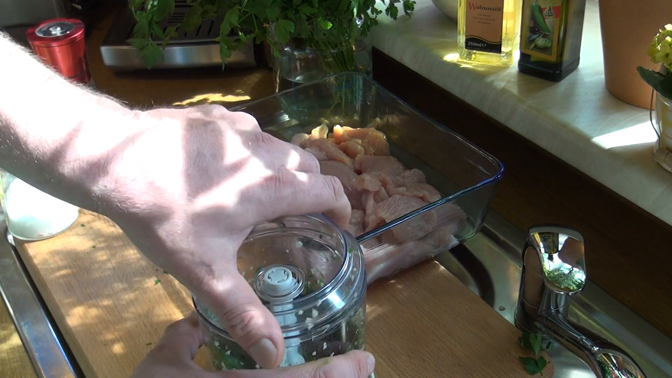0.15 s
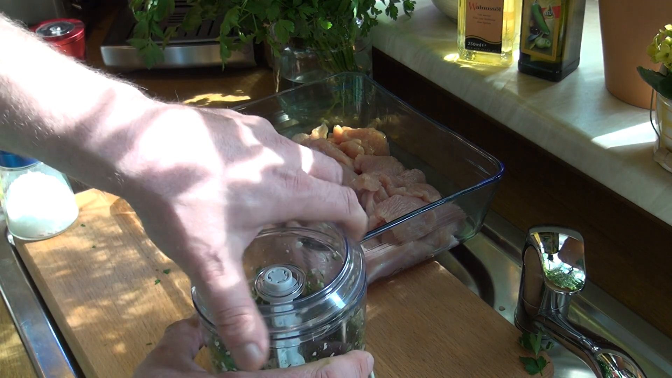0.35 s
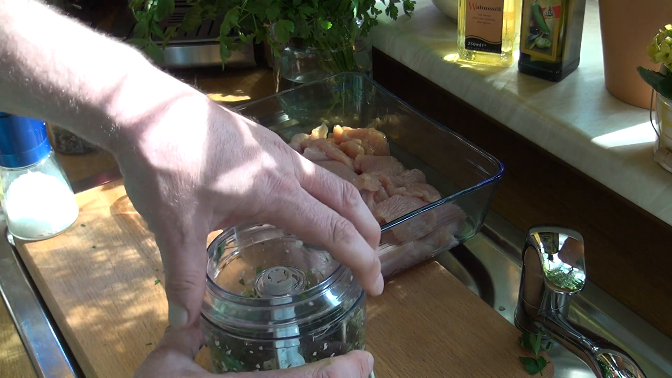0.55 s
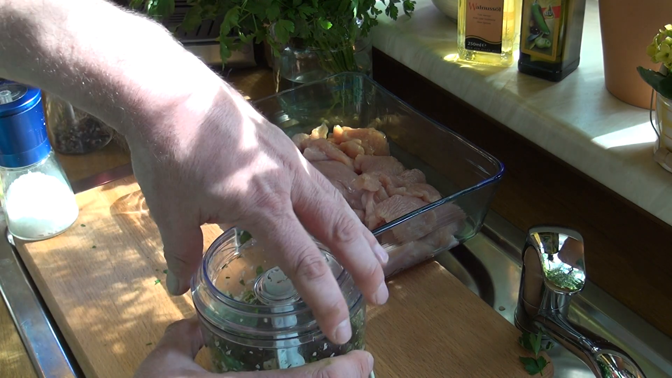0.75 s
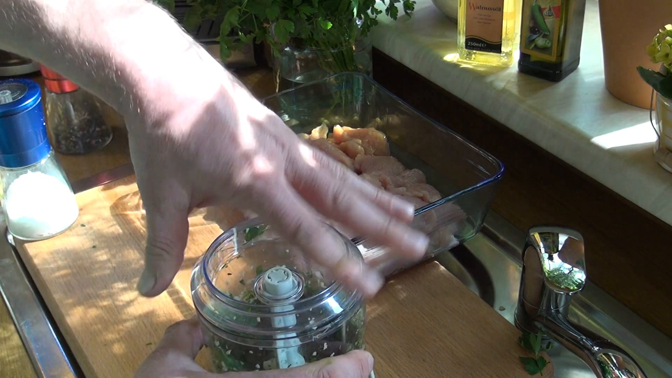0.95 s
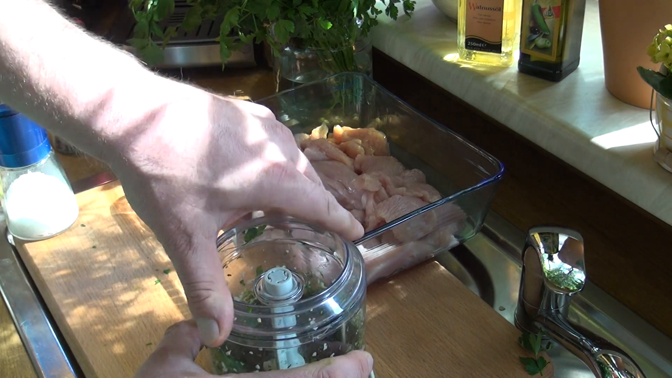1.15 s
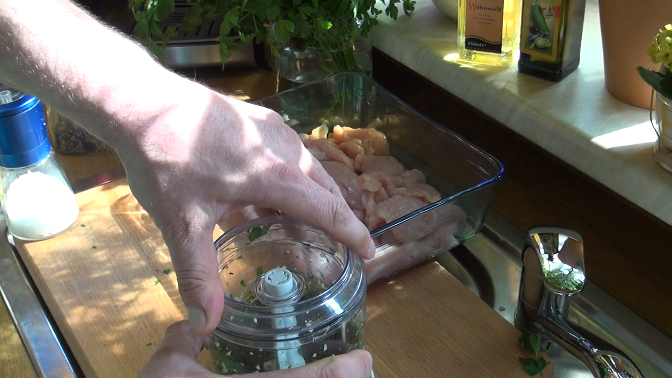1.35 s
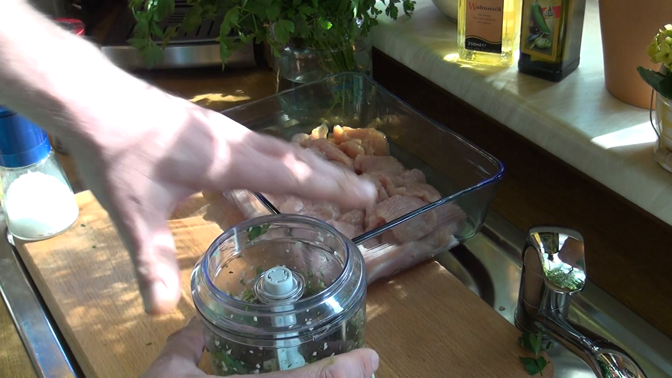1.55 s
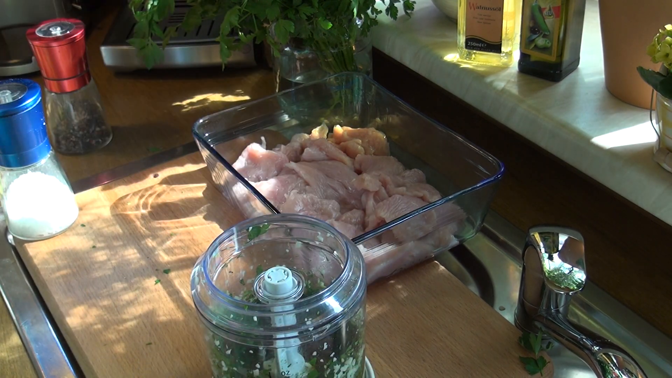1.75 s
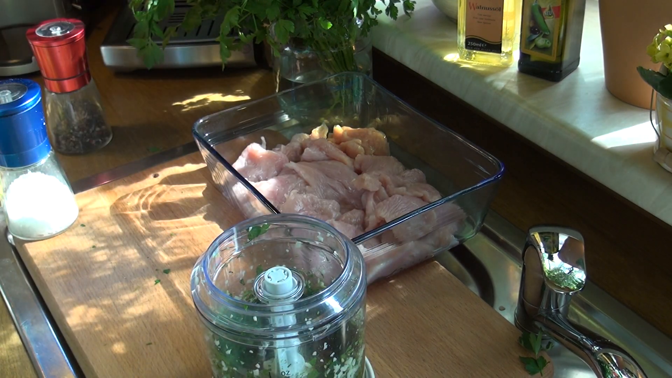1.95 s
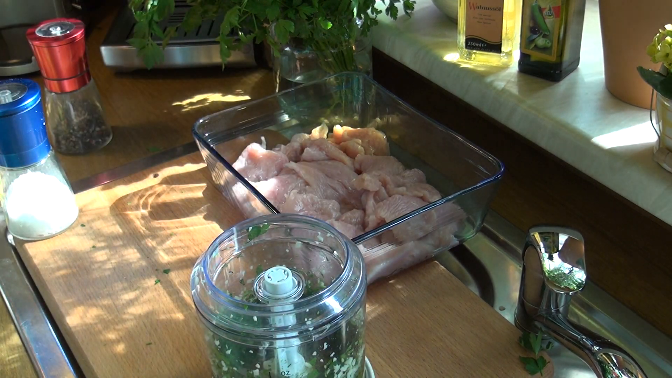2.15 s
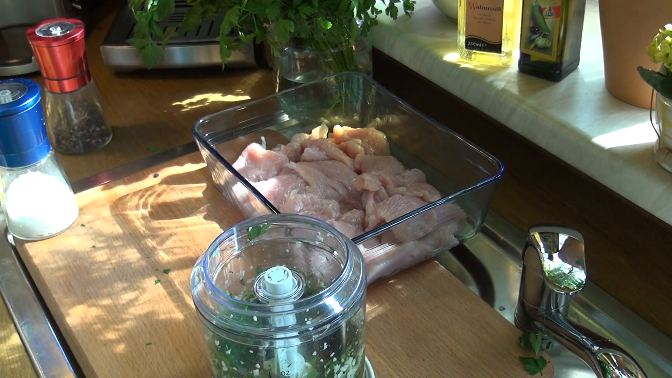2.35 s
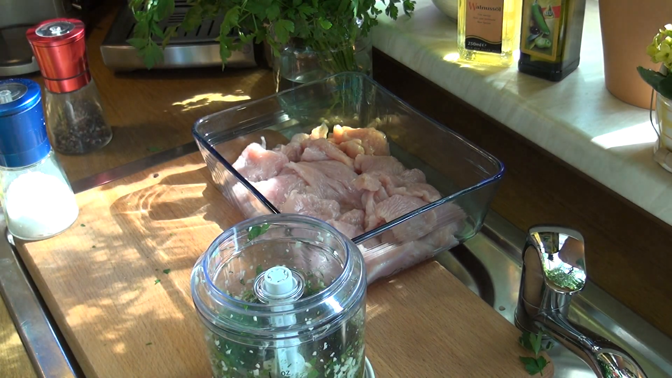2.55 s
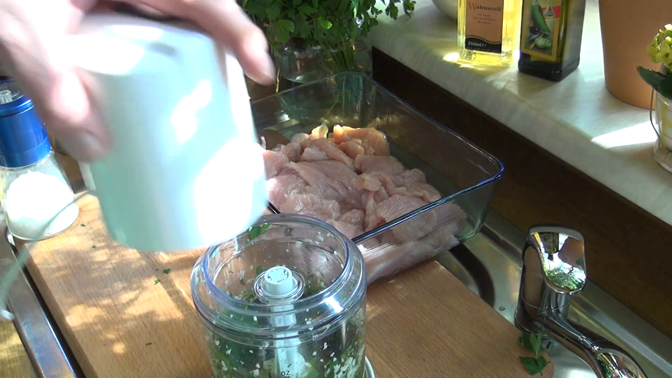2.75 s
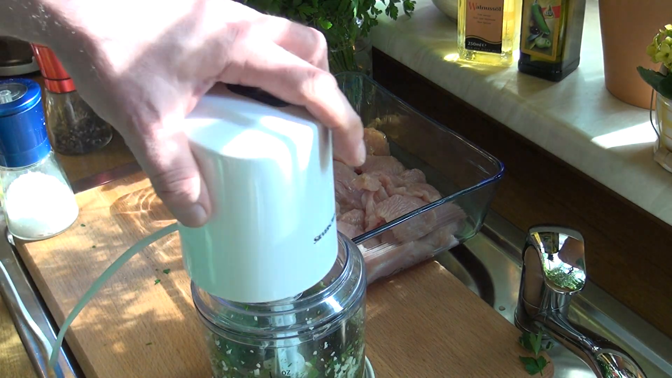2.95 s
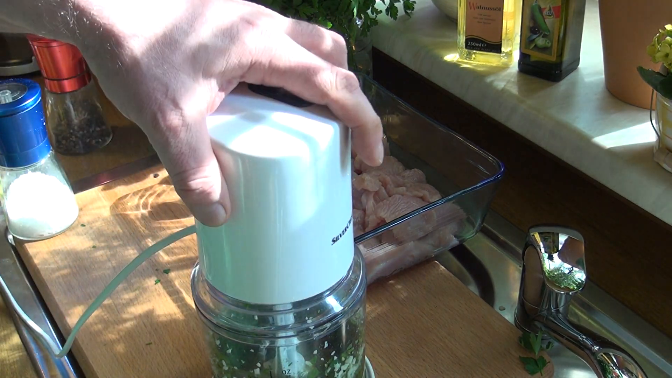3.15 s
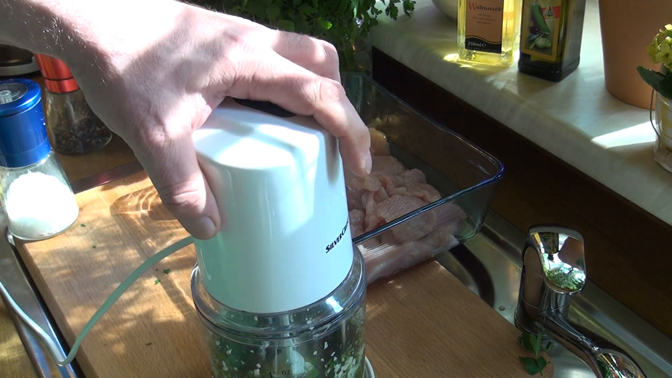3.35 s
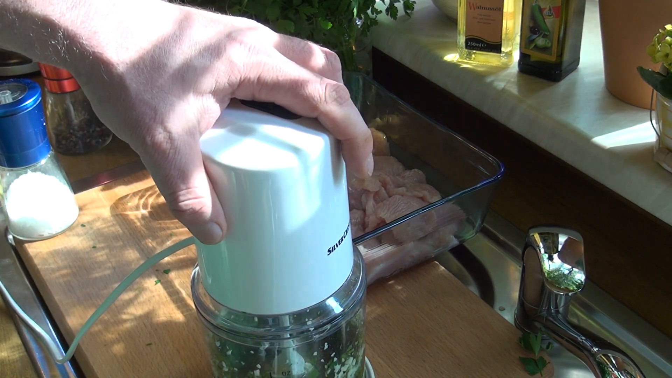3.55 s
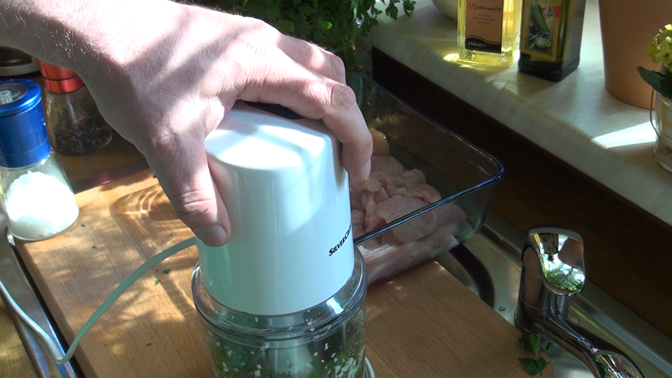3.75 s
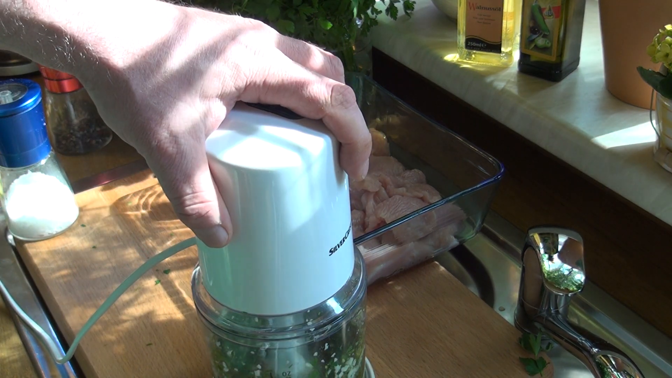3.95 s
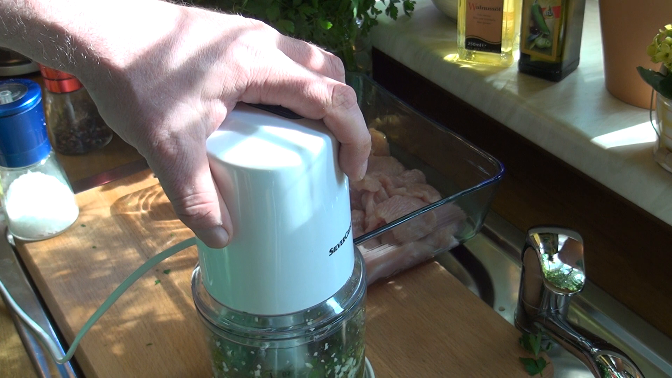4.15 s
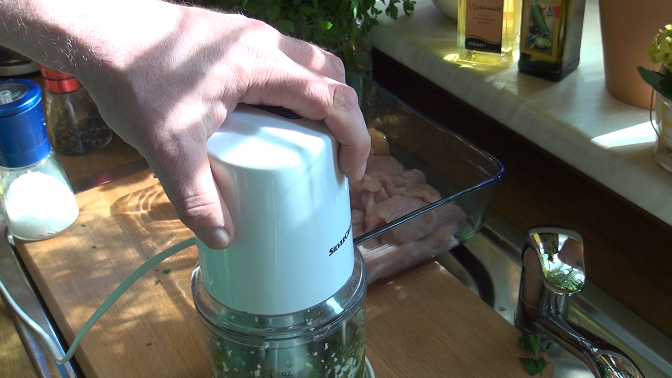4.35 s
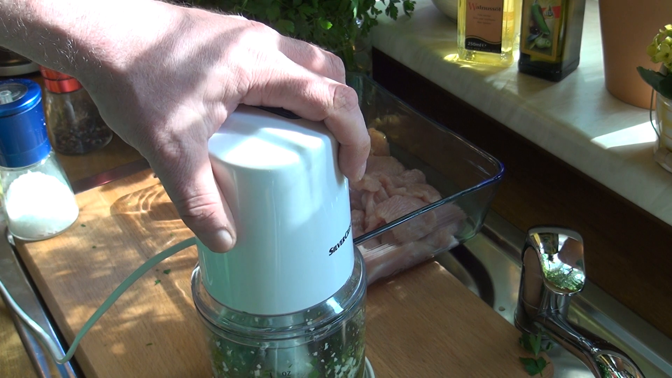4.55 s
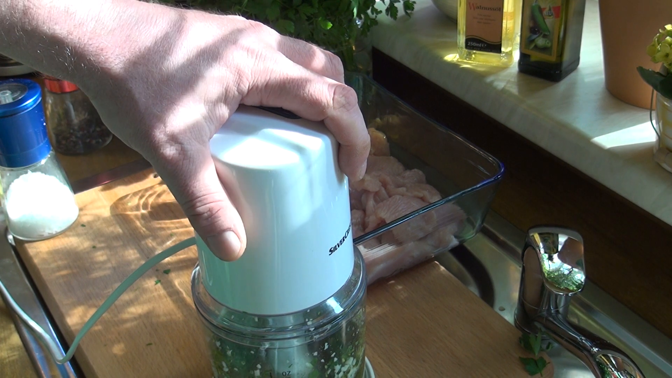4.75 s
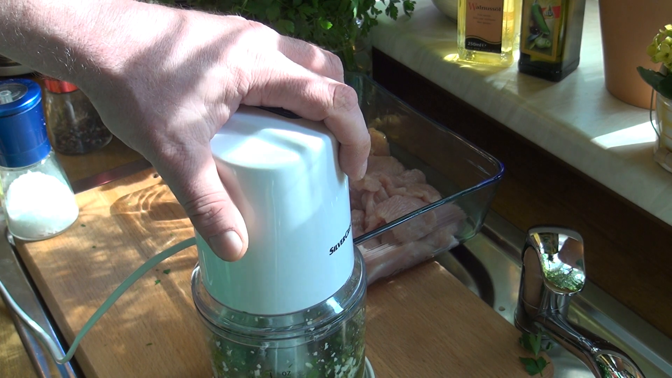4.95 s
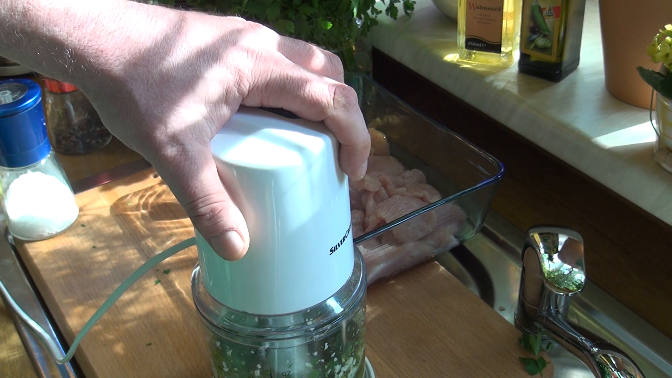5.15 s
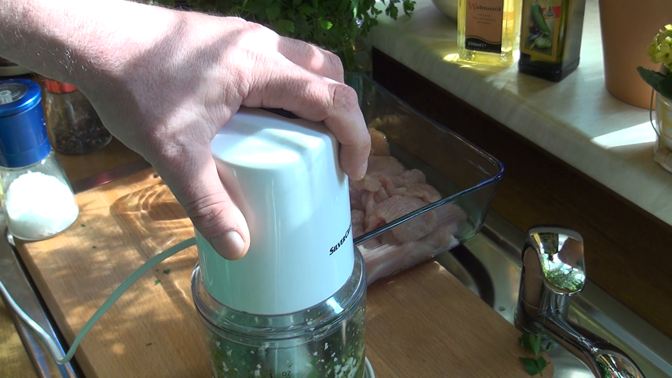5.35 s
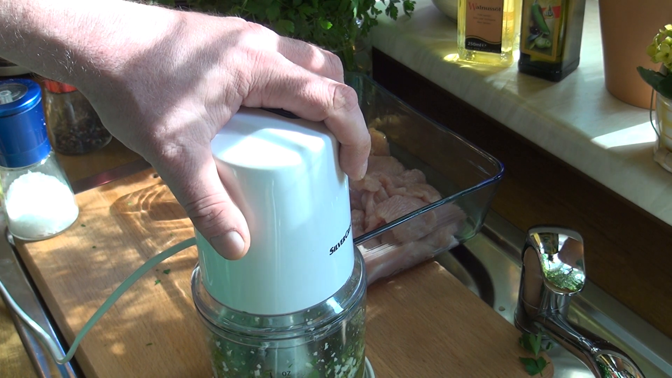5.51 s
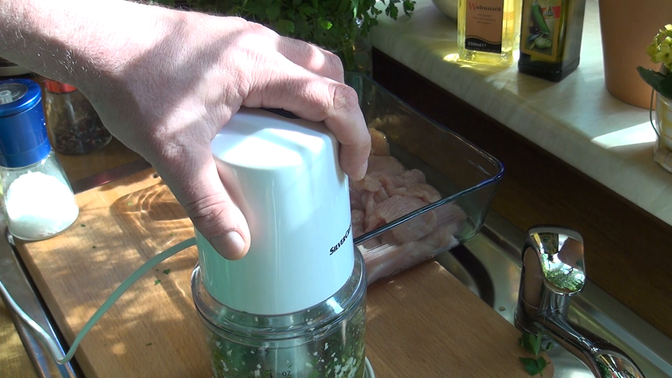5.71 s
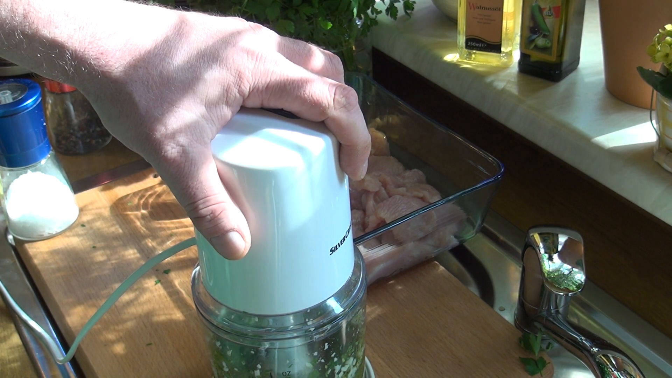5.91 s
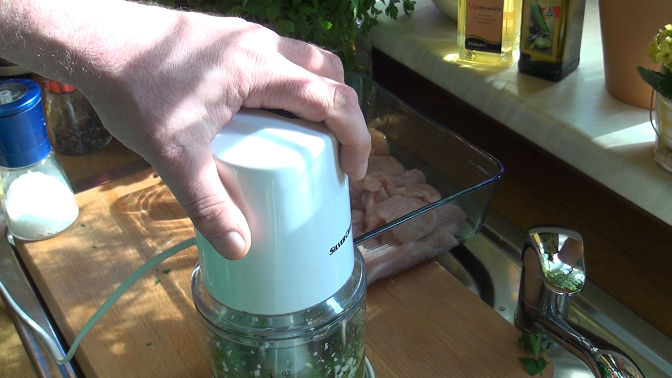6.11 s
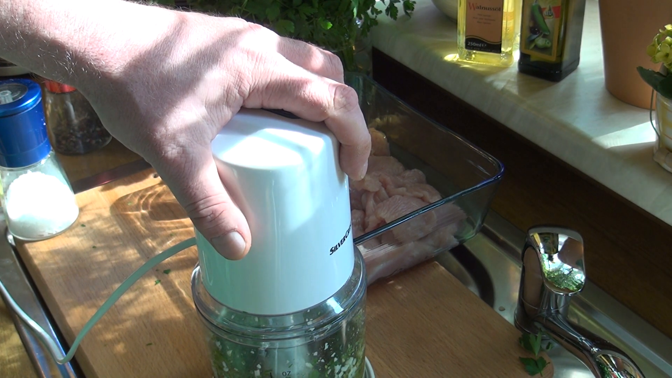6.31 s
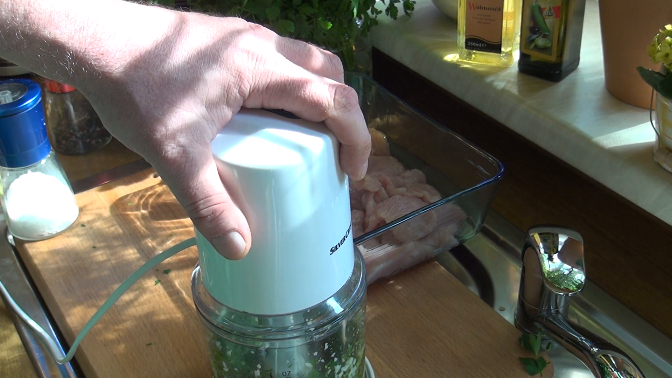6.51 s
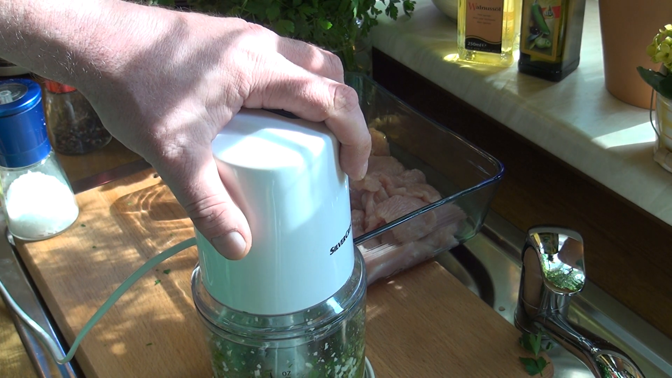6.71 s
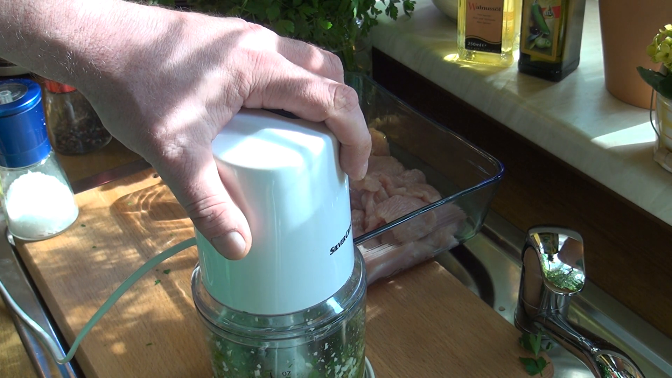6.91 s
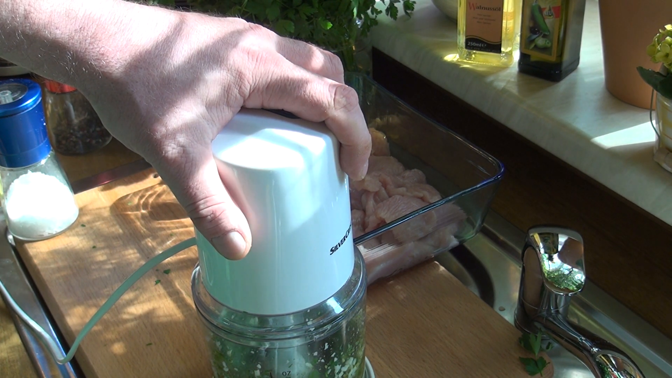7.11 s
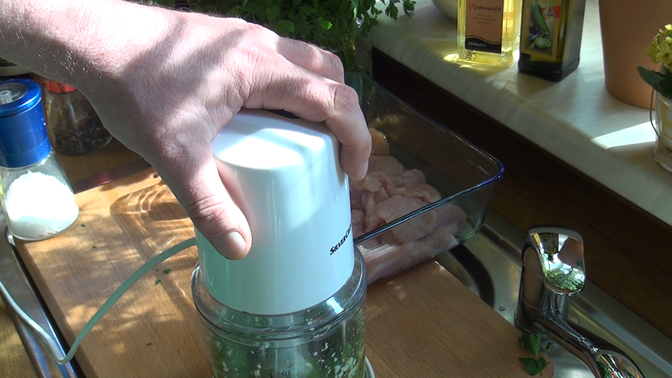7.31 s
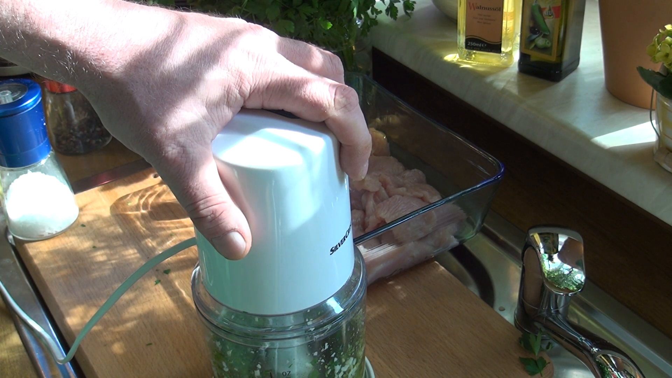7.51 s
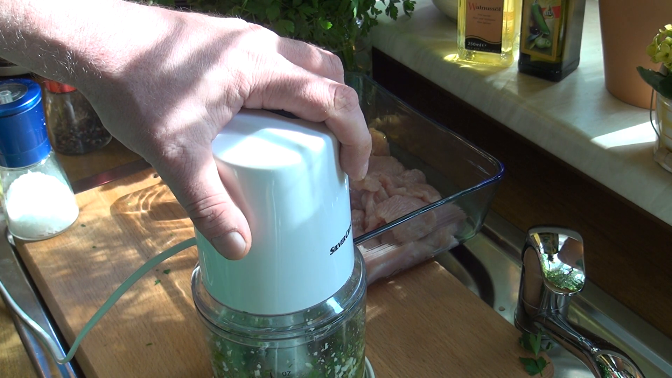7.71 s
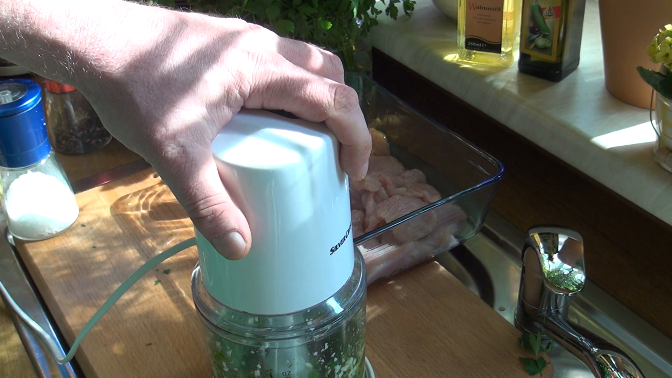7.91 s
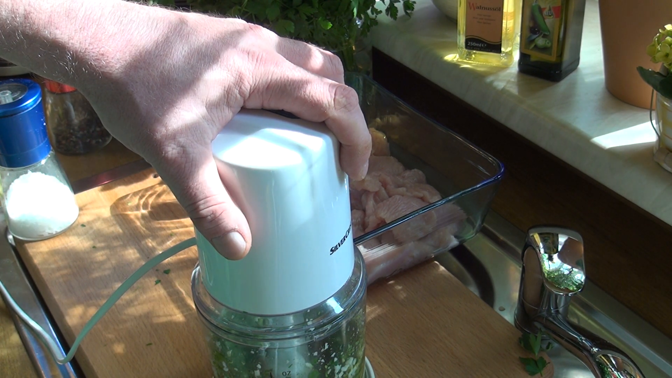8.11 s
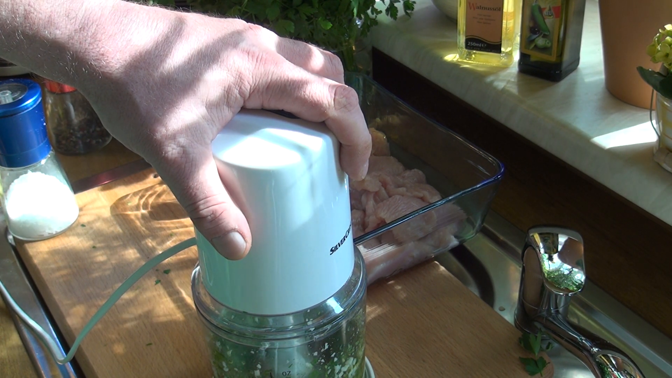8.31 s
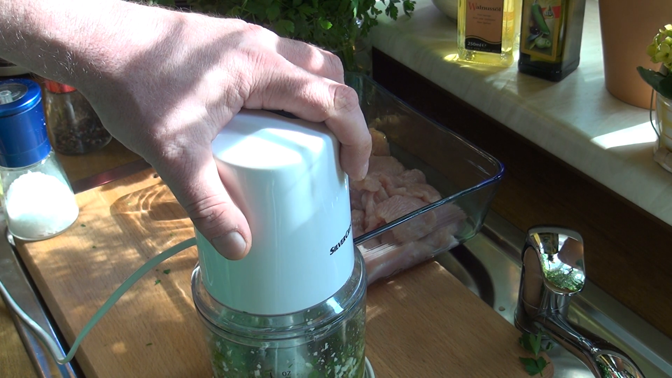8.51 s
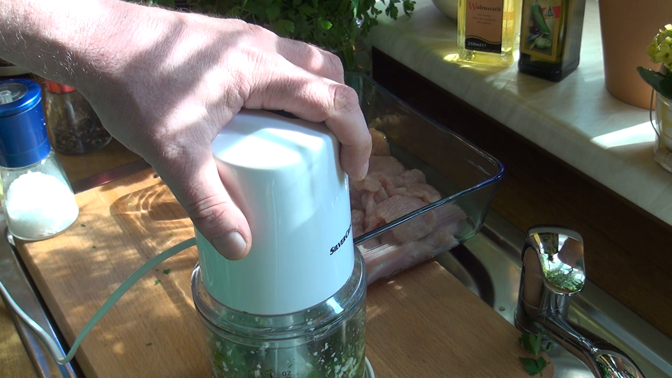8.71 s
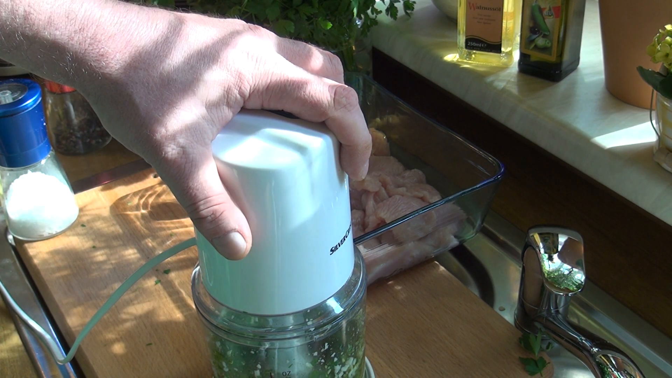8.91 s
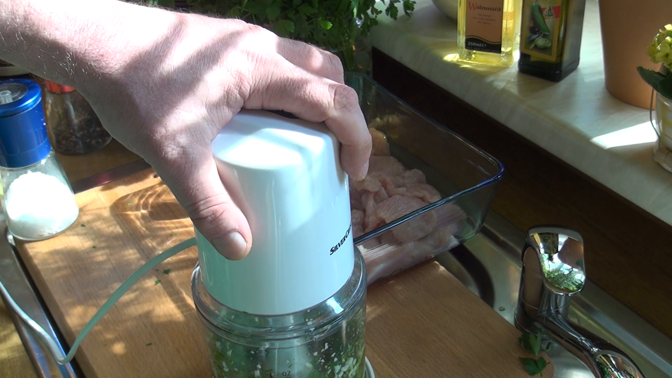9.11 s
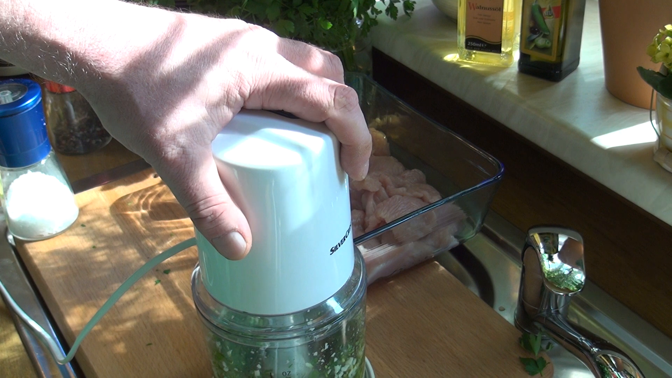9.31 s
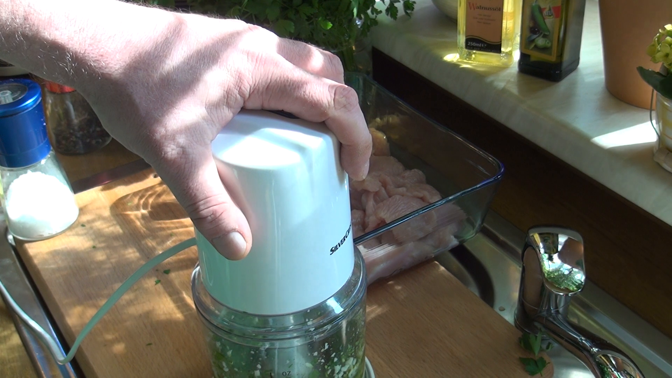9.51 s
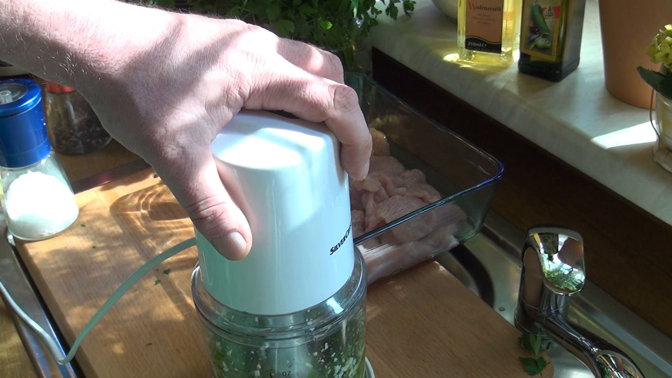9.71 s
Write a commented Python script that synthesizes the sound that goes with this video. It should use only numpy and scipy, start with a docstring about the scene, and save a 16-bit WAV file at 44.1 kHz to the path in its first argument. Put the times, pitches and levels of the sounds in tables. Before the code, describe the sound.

A plastic lid knocks onto a bowl, a motor unit clicks into place, then a small electric chopper runs with a rattling whir.

```python
"""Plastic knocks and scrapes, close by in a small kitchen: a mini chopper's lid is pressed and twisted
onto its bowl, which stands on a wooden board. The motor unit is set on top and clicks home.
Then the motor runs: the blade shaft rattles in its coupling, the gear whines, herbs and oil are flung
round the bowl and its wall sings. Knocks are bursts of force through the plastic's resonances;
the running machine is trains of blows, timed by the shaft and coloured by the bowl."""
import sys
import numpy as np
from scipy import signal
from scipy.fft import rfft, irfft
from scipy.io import wavfile
from scipy.ndimage import uniform_filter1d, minimum_filter1d, map_coordinates

SR = 44100
rng = np.random.default_rng(int(sys.argv[2]) if len(sys.argv) > 2 else 0)


def store_wav(level_fs):
    """Save 16-bit WAV to argv[1]."""
    pcm = np.round(np.clip(np.atleast_2d(level_fs), -1, 1) * 32767)
    wavfile.write(sys.argv[1], SR, pcm.T.astype(np.int16))


N = 434826
TIME = np.arange(N) / SR
PRESSED_UNTIL_S, SWITCH_ON_S = 1.0, 3.624

# the lid knocks on the bowl: (time [s], thump [dB], knock [dB], hardness [dB/octave], favoured mode [Hz])
LID_HITS = [(0.002, 3, 4.5, -4, 320), (0.031, 12, -0.5, -2.5, 314), (0.051, 0, -7, -6, 337),
            (0.069, 13, 6.5, 2.6, 1030), (0.072, 0, 11.5, -3.5, 428), (0.185, -2, -16, 3.5, 1070),
            (0.215, 11.5, 3, -3, 790), (0.346, -6, -17, -4, 340), (0.596, 6, -10.5, -6.5, 316),
            (0.678, 21, -2.5, -0.5, 323), (0.688, 13, 7.5, 0.5, 1120), (0.695, 19, 21.5, -2, 1110),
            (0.805, 10, 16, -2, 2520), (0.809, 12, 12, -2.5, 227), (0.884, -14, -9, -0.5, 380),
            (0.94, -25, -10, -3, 384), (1.161, 11, -2, -1, 1040), (1.176, 17, 7, -3, 233),
            (1.184, 5, -9, -1, 1100), (1.191, 9, -2, -3, 320), (1.245, -8, 14, -2.3, 1560),
            (1.249, -5, 9.5, -4.5, 880), (1.296, -12, -16, 6.5, 9050), (1.386, 4, -1, -2, 1120),
            (1.414, -10, -14, -2, 900)]
# the motor unit is picked up, set on, seated and pressed:
# (time [s], thump [dB], knock [dB], hardness [dB/octave], chatter decay [s], favoured mode [Hz])
UNIT_HITS = [(2.221, 11, -27, 2, 0.028, 151), (2.249, 4, -14.5, 1.5, 0.028, 160),
             (2.27, 0, -14.5, -5, 0.018, 160), (2.855, -3, 0.5, -0.3, 0.014, 1510),
             (2.99, 5, 8.5, -1.5, 0.0054, 885), (2.996, 15, 10.5, 3.5, 0.006, 2500),
             (3.0, 3, 11.5, 1.2, 0.039, 5700), (3.011, 23, 3, -8.5, 0.013, 340),
             (3.16, 9, -8.5, -4, 0.006, 330), (3.165, 13.5, -2.5, -5, 0.0064, 312),
             (3.208, 2, -25, -6, 0.006, 320), (3.309, 7, -11, -5, 0.01, 472),
             (3.324, 12, 14, 0.5, 0.0081, 665), (3.331, 12, 5, -2.5, 0.0063, 630),
             (3.338, 17, -0.5, -5, 0.01, 330), (3.586, -4, -18, -5.5, 0.0059, 1500),
             (3.627, 15.5, 8.5, -3.5, 0.016, 312)]
# tone of a motor unit knock at zero hardness: (frequency [Hz], level [dB])
UNIT_HIT_TONE = [(380, -3.5), (660, 1.5), (1150, -2.5), (1800, -1), (3500, -2.5), (6500, -3), (8000, -7),
                 (9000, -11.5), (16000, -24)]


def motor(slosh_db=-31, rattle_db=-21, spray_db=-37.5, mains_hz=50):
    """The loose coupling knocks once a turn, two blades slap the herbs and the drive splines tick."""
    # slowed by whole herbs, the shaft gains speed, then follows the load: (time [s], speed [turns/s])
    shaft = [(3.62, 82), (3.85, 84.5), (4.1, 87), (4.45, 89.3), (4.95, 90.7), (5.65, 89.5), (6.45, 91),
             (6.9, 89.8), (7.9, 91.9), (8.5, 90.2), (9.86, 91)]
    # the blades first hit the heap: (start [s], end [s], level [dB])
    fling = [(3.635, 3.69, -25)]
    # the blades rasp through coarse leaves and stalks: (start [s], end [s], level [dB])
    chopping = [(3.9, 5.0, -37.5)]
    running = np.maximum(TIME - SWITCH_ON_S, 0)
    on = 1 - np.exp(-running / .003)
    speed = np.interp(TIME, *np.transpose(shaft)) * (1 - np.exp(-running / .04)) * (1 + .006 * drift(25))
    turns = np.cumsum(speed) / SR
    # the load surges; the first bite rattles hardest; as paste forms, sloshing grows and the rest eases
    surge_db = .37 * drift(2.78)
    slosh_level = slosh_db + .47 * running + surge_db
    rattle_level = rattle_db - .09 * running + 2 * np.exp(-running / .37)
    spray_level = spray_db - .1 * running + surge_db - 7 * np.exp(-running / .09)

    slipping = np.maximum.accumulate(turns + on * .16 * drift(50))
    knocking = strikes(slipping, count=1, scatter=.06, spread_db=2.5)
    coupling = amp(-2) * buzz(knocking, decay_s=.0028)
    blades = buzz(strikes(turns, count=2, scatter=.08, spread_db=2), decay_s=.0043)
    splines = amp(-6) * buzz(strikes(turns, count=3, scatter=.12, spread_db=3), decay_s=.001)
    wash = rms_one(on * rng.standard_normal(N) * amp(2 * drift(40)))
    throb = 1 + .19 * np.sin(2 * np.pi * 2 * mains_hz * TIME)  # torque pulses twice per mains cycle
    clatter = throb * (coupling + amp(-3) * blades + splines) + amp(-5) * wash

    # EQ of each layer: (frequency [Hz], gain [dB])
    slosh_eq = [(650, 1.5), (1100, -.5), (1700, -47), (4000, -90)]
    fling_eq = [(150, -8), (450, -3), (700, -3), (1050, 1), (1600, -14), (2400, -3), (3500, -9)]
    rattle_eq = [(250, -22), (650, -9), (1100, .5), (1600, 0), (5000, -1.5), (7000, -11.5),
                 (12000, -29.5)]
    spray_eq = [(2000, -62), (4500, -17.5), (7000, -2), (9000, 1.5)]
    shaft_eq = [(2400, -25), (3300, -16), (3550, 13.5), (3730, 17), (4100, 8.5), (4500, 0), (6000, -33.5)]
    rasp_eq = [(2400, -19.5), (3400, 3), (3750, -4.5), (4400, 4), (5000, -3), (5600, -19), (8000, -25)]
    churn = amp(slosh_level + .29 * drift(25)) * radiate(blades + wash, slosh_eq)
    slosh = np.interp(TIME + .0005 * drift(11), TIME, churn)  # the tumbling mixture bends the resonances
    splat = spells(fling, attack_s=.01, release_s=.02) * radiate(blades, fling_eq)
    rattle = amp(rattle_level + .48 * drift(25)) * radiate(clatter, rattle_eq)
    spray = amp(spray_level + 1.34 * drift(150)) * radiate(clatter + wash, spray_eq)
    shaft_ring = amp(rattle_level - 7) * radiate(knocking, shaft_eq)
    rasp = spells(chopping, attack_s=.064, release_s=.37) * radiate(clatter, rasp_eq)
    sound = slosh + splat + rattle + spray + shaft_ring + rasp + gear_whine(speed) + wall_song()
    spin_up = on * amp(-4 * np.exp(-running / .0055))
    return spin_up * sound


def strikes(turns, count, scatter, spread_db):
    """Clicks, `count` per shaft turn, each a little early or late and of its own strength."""
    timing, strength = rng.standard_normal((8000, 2)).T
    at_turn = (np.arange(len(timing)) + scatter * timing) / count
    inside = (at_turn > 0) & (at_turn < turns[-1])
    clicks = np.zeros(N)
    clicks[np.searchsorted(turns, at_turn[inside])] = amp(spread_db * np.clip(strength[inside], -2, 2))
    return clicks


def radiate(force, eq):
    """One band of the machine's vibration sounds through housing and bowl; rms 1 while running."""
    # broad spectrum of the running machine: (frequency [Hz], level [dB])
    machine = [(25, -25), (90, -21), (160, -8), (250, -12), (400, -6), (1200, -6), (1800, -9), (3000, -2),
               (4000, -6.5), (5000, -8.5), (6500, -13), (10000, -23), (14500, -32.5), (15800, -40.5)]
    # resonances and hollows of the bowl on its board: (frequency [Hz], width [Hz], gain [dB])
    bowl = [(112, 24, 6), (130.8, 30, -9), (182, 20, 4), (248, 31, 18.5), (308, 32, 14), (453, 60, 7),
            (554, 24, 5), (640, 30, 7.5), (779, 36, -9), (812, 80, 6), (903, 50, 4), (1101, 20, 3),
            (1152, 24, 4), (1530, 30, 5.5), (1718, 80, 6.5), (1862, 190, 6.5), (2020, 56, 10),
            (2130, 80, 6), (2212, 40, -6), (2568, 90, 6), (2695, 39, 4), (2770, 60, 2.5), (2849, 36, 5),
            (2913, 44, 5.5), (2982, 44, -7), (3037, 33, 4.5), (3260, 100, -3), (3572, 53, 3.5),
            (3736, 36, 4), (3770, 800, 2.5), (4093, 50, 8), (4250, 100, -2.5), (4350, 76, 6.5),
            (4540, 90, 3), (4860, 160, 2.5), (5130, 260, -4), (5440, 250, 6), (6340, 60, 4),
            (6430, 90, -3.5), (7680, 200, -2.5), (8020, 220, 3), (8850, 450, -2.5), (9300, 240, 4.5),
            (10900, 450, -2.5), (12050, 300, 3.5), (13400, 400, 2), (15250, 450, 3.5)]
    sound = colour(force, lambda hz: at_hz(machine, hz) + peaks_db(bowl, hz) + at_hz(eq, hz))
    return sound / np.std(sound[TIME > SWITCH_ON_S])


def gear_whine(speed):
    """The gear whines on multiples of the shaft speed."""
    # gear tones: (start [s], end [s], level [dB], multiple of the shaft speed)
    whines = [(3.72, 4.15, -42, 8), (3.78, 4.1, -41, 10), (4.08, 4.45, -38, 10), (4.55, 8.35, -42.5, 10),
              (8.45, 8.85, -37.5, 10), (3.75, 4.0, -39.5, 12)]
    return sum(spells([spell]) * whistle(multiple * speed, flutter_db=2, flutter_hz=25)
               for *spell, multiple in whines)


def wall_song(lower_hz=1106, upper_hz=2022, rise_hz_per_s=3.8):
    """Two modes of the bowl's wall sing as the oil coats it; the lower creeps up in pitch."""
    # the lower mode comes and goes: (start [s], end [s], level [dB])
    lower_spells = [(4.95, 5.6, -42), (6.02, 6.4, -35), (6.6, 7.25, -37.5), (7.45, 8.35, -35),
                    (8.55, 8.9, -43), (8.92, 9.86, -34.5)]
    # the upper mode rings more evenly once the herbs are fine: (start [s], end [s], level [dB])
    upper_spells = [(4.8, 9.86, -40)]
    pitch = lower_hz + rise_hz_per_s * (TIME - 8.2) + 9 * drift(45)
    lower = spells(lower_spells) * whistle(pitch, flutter_db=2.8, flutter_hz=22)
    upper = spells(upper_spells) * whistle(upper_hz + 16 * drift(70), flutter_db=2.8, flutter_hz=35)
    return lower + upper


def knocks(crossover_hz=600, attack_s=.00029, size=16384):
    """Plastic meets plastic: one push in the bass, with a snap and a short chatter above it."""
    # resonances and hollows of the struck lid and bowl: (frequency [Hz], width [Hz], gain [dB])
    lid_modes = [(107, 15, 4), (136, 68, -23), (248, 50, 10.5), (329, 83, 10), (452, 105, 6),
                 (660, 230, -1), (800, 190, 4), (1530, 330, 4), (2170, 94, 2), (2470, 780, 3),
                 (3530, 360, -4.5), (4580, 870, 3), (7150, 4000, -3.5)]
    out, t = np.zeros(N), np.arange(size) / SR
    lowpass = signal.butter(2, crossover_hz, fs=SR, output="sos")
    highpass = signal.butter(1, crossover_hz, "high", fs=SR, output="sos")
    push = amp(-2) * signal.sosfilt(lowpass, signal.unit_impulse(size))

    def burst(decay_s):
        """A dying burst of force with unit energy."""
        force = rng.standard_normal(size) * (1 - np.exp(-t / attack_s)) * np.exp(-t / decay_s)
        return force / np.linalg.norm(force)

    for s, tone, chatter_s, favoured_hz in contacts():
        snap = burst(.55 * chatter_s)
        clack = snap + amp(2) * burst(chatter_s)
        force = push + signal.sosfilt(highpass, clack / np.linalg.norm(clack))
        # each spot struck favours one mode and adds damped ones of its own
        modes = [(hz, width, db * rng.uniform(.8, 1.1)) for hz, width, db in lid_modes]
        modes += [(favoured_hz, favoured_hz / 7, 8)]
        spot_hz = np.exp(rng.uniform(np.log(600), np.log(9000), size=10))
        modes += [(hz, hz / 8, 3.5 * rng.standard_normal()) for hz in spot_hz]
        start = int(s * SR)
        out[start:start + size] += amp(-2) * colour(force, lambda hz: at_hz(tone, hz) + peaks_db(modes, hz))
    return out


def contacts():
    """Lid knocks, unit knocks and finger taps as (time [s], spectrum, chatter decay [s], mode [Hz])."""
    # tone of a lid knock at zero hardness, and of a tap: (frequency [Hz], level [dB])
    lid_tone = [(380, -7), (1150, -1), (3500, -6), (9000, -7), (16000, -19)]
    tap_tone = [(25, -16), (130, 4), (380, -2), (1150, -0.5), (3500, -8.5), (9000, -17.5), (16000, -21)]
    # extra boom of the bowl while the lid is pressed down: (frequency [Hz], gain [dB])
    boom = [(130, 2.5), (350, 10), (1000, -1)]
    # fingers tap the plastic lightly: (time [s], level [dB])
    taps = [(1.505, -14.5), (1.526, -9), (1.547, -6.5), (2.405, -17), (2.493, -20), (2.513, -22),
            (2.633, -15), (2.74, -13.5), (2.768, -15)]
    hits = []
    for s, thump_db, knock_db, hardness, mode_hz in LID_HITS:
        tone = blow_tone(lid_tone, thump_db, knock_db, hardness)
        if s < PRESSED_UNTIL_S:
            tone = [(hz, db + at_hz(boom, hz)) for hz, db in tone]
        chatter_s = .0051 * 2 ** (-hardness / 3.7)  # harder hits are shorter
        hits.append((s, tone, chatter_s, mode_hz))
    for s, *blow, chatter_s, mode_hz in UNIT_HITS:
        hits.append((s, blow_tone(UNIT_HIT_TONE, *blow), chatter_s, mode_hz))
    return hits + [(s, [(hz, tap_db + db) for hz, db in tap_tone], .013, 1040) for s, tap_db in taps]


def blow_tone(tone, thump_db, knock_db, hardness):
    """Spectrum of one blow: its weight thumps the board, its hardness tilts the knock to the treble."""
    thump = [(25, thump_db - 27), (60, thump_db - 20), (130, thump_db)]
    return thump + [(hz, knock_db + db + hardness * np.log2(hz / 1150)) for hz, db in tone]


def housing(ring_db=-49.5, size=16384):
    """The hollow motor unit rings at each of its knocks; a soft contact favours the low modes."""
    # housing modes: (frequency [Hz], level [dB], time to fall 60 dB [s])
    modes = [(159, -12, 0.28), (223, -7, 0.57), (270, -7, 0.24), (305, 2, 0.47), (352, -3, 0.16),
             (630, -7, 0.1), (2350, -4, .1), (2430, -6, .1), (2610, -5, .1), (4940, -12, .06)]
    out, t = np.zeros(N), np.arange(size) / SR
    for s, *blow, _, _ in UNIT_HITS:
        start, tone = int(s * SR), blow_tone(UNIT_HIT_TONE, *blow)
        for hz, mode_db, t60 in modes:
            strength = amp(ring_db + at_hz(tone, hz) + mode_db + rng.standard_normal())
            out[start:start + size] += strength * np.sin(2 * np.pi * hz * t) * amp(-60 * t / t60)
    return out


def wall_ring(handling):
    """While the lid is pressed and twisted on, the contacts set the bowl's wall ringing."""
    # wall modes under pressure: (frequency [Hz], width [Hz], gain [dB])
    modes = [(1070, 27, 10.5), (3900, 200, -1), (4550, 100, 2), (4940, 130, 0)]
    pressed = handling * (TIME < PRESSED_UNTIL_S)
    return sum(amp(db) * signal.lfilter(*signal.iirpeak(hz, hz / width, fs=SR), pressed)
               for hz, width, db in modes)


def lid_twist(hiss_db_per_s=-12):
    """The lid slides round in its seat: a low rub under a grainy, easing hiss."""
    # the slide: (start [s], end [s], level [dB])
    twist = [(0.348, 0.68, -46.5)]
    # spectra of the friction: (frequency [Hz], level [dB])
    rub_tone = [(59, -52), (100, -16), (326, 3), (673, -12), (1060, -13), (1310, -22), (1650, -14.5),
                (3000, -23), (3900, -46), (6600, -120)]
    hiss_tone = [(880, -26), (1500, -6), (3060, 1), (3310, 0), (4690, 0.5), (9470, 3), (16000, -9)]
    easing_db = hiss_db_per_s * np.maximum(TIME - twist[0][0], 0)
    rub = noise(rub_tone)
    hiss = amp(-4 + easing_db + 2 * drift(166.5)) * noise(hiss_tone)
    return spells(twist, attack_s=.02, release_s=.015) * (rub + hiss)


def knock_pulses():
    """Two click tracks on the lid and unit hits, one as strong as each thump, one as each knock."""
    thumps, jolts = np.zeros((2, N))
    for s, thump_db, knock_db, *_ in LID_HITS + UNIT_HITS:
        thumps[int(s * SR)], jolts[int(s * SR)] = amp(thump_db), amp(knock_db)
    return thumps, jolts


def hands(thumps, jolts, settle_s=.057):
    """Fingers bump and brush the plastic, most of all just after a knock; the arm rustles."""
    # a hand holds the lid, grips anew, then holds the motor unit: (start [s], end [s], level [dB])
    grips = [(0.0, 0.16, -53), (0.35, 1.59, -58), (3.0, 3.7, -76)]
    # the arm reaches away and back: (start [s], end [s], level [dB])
    reaches = [(1.68, 1.92, -60), (2.7, 2.87, -57.5)]
    bump_tone = [(40, -17), (110, -5.5), (200, -15), (310, 0), (500, -11), (1500, -39), (5000, -34.5)]
    brush_tone = [(200, 6.5), (700, 5), (1500, 4), (3200, -1.5), (7000, -7), (16000, -20)]
    grip = spells(grips, attack_s=.018, release_s=.091)
    arm = spells(reaches, attack_s=.019, release_s=.37)
    bump = grip + amp(-63) * fade(thumps, settle_s)
    brush = arm + amp(-11) * grip + amp(-64) * fade(jolts, settle_s)
    return bump * noise(bump_tone) + brush * noise(brush_tone)


def board(thumps):
    """The weight of each knock rocks the wooden board for a moment."""
    thud_tone = [(25, -39), (50, -6), (110, -2), (170, -3.5), (400, -42), (2000, -80)]
    return amp(-58) * fade(thumps, decay_s=.051) * noise(thud_tone)


def kitchen(x, size=20000):
    """Diffuse reverb of a small room, dying sooner in the treble; unit gain."""
    # room decay: (frequency [Hz], time to fall 60 dB [s])
    decay = [(100, 0.39), (290, 0.25), (700, 0.18), (1800, 0.22), (5000, 0.21), (13000, 0.16)]
    t, tail = np.arange(size) / SR, 0
    edges = 45 * 2 ** np.arange(0, 9, .5)
    for low, high in zip(edges, edges[1:]):
        bandpass = signal.butter(2, [low, high], "band", fs=SR, output="sos")
        band = signal.sosfilt(bandpass, rng.standard_normal(size))
        tail = tail + band * amp(-60 * t / at_hz(decay, np.sqrt(low * high)))
    tail = tail * np.clip((t - .004) / .0043, 0, 1)  # pre-delay, then a short swell
    return signal.fftconvolve(x, tail / np.linalg.norm(tail))[:N]


def room_tone(air_db=-62, hum_hz=54, hum_db=-67):
    """Quiet room air with a faint, wavering low hum."""
    # spectrum of the quiet kitchen: (frequency [Hz], level [dB])
    air = [(12, -35), (20, -10), (60, -9), (210, -27), (310, 0), (399, -10), (607, -9), (949, -15),
           (1060, -14), (1190, -16), (3160, -23), (3840, -25), (16000, -28.5)]
    hum = np.sqrt(2) * np.sin(2 * np.pi * np.cumsum(hum_hz + 2 * drift(2.8)) / SR)
    return amp(air_db) * noise(air) + amp(hum_db + 2 * drift(4.8)) * hum


def amp(db):
    """Decibels to gain."""
    return 10 ** (np.asarray(db) / 20)


def rms_one(x):
    """Scale to unit rms."""
    return x / np.sqrt(np.mean(x ** 2) + 1e-20)


def at_hz(points, hz):
    """Read a curve on a log-frequency axis."""
    f, value = np.transpose(points)
    return np.interp(np.log(hz + 1e-3), np.log(f), value)


def peaks_db(modes, hz):
    """Response in dB of a set of resonances."""
    return sum(db / (1 + (2 * (hz - centre) / width) ** 2) for centre, width, db in modes)


def colour(x, response_db, size=16384):
    """Minimum-phase EQ with the given response in dB."""
    cepstrum = irfft(np.log(amp(response_db(np.fft.rfftfreq(size, 1 / SR)))))
    cepstrum[1:size // 2] *= 2
    cepstrum[size // 2 + 1:] = 0
    impulse = irfft(np.exp(rfft(cepstrum)))[:size // 2]
    return signal.oaconvolve(x, impulse)[:len(x)]


def noise(spectrum):
    """Noise shaped by (frequency [Hz], level [dB]) points; rms 1."""
    return rms_one(colour(rng.standard_normal(N), lambda hz: at_hz(spectrum, hz)))


def drift(rate_hz):
    """Smooth random wandering with spread 1."""
    knots, coarse = rng.standard_normal(4000), TIME[::20]
    curve = map_coordinates(knots, [coarse * rate_hz], order=2, mode="wrap")
    return np.interp(TIME, coarse, rms_one(curve))


def fade(clicks, decay_s):
    """Every click becomes an exponential decay."""
    return signal.lfilter([1], [1, -np.exp(-1 / (decay_s * SR))], clicks + 1e-18)


def buzz(clicks, decay_s):
    """Every click becomes a brief burst of noise; rms 1."""
    return rms_one(fade(clicks, decay_s) * rng.standard_normal(N))


def whistle(hz, flutter_db, flutter_hz):
    """A tone on a moving pitch whose level flutters; rms about 1."""
    return amp(flutter_db * drift(flutter_hz)) * np.sqrt(2) * np.sin(2 * np.pi * np.cumsum(hz) / SR)


def spells(rows, attack_s=.04, release_s=.09):
    """Envelope that swells at each start, holds, and dies away after each end."""
    return sum(amp(db) * (1 - np.exp(-np.maximum(TIME - start, 0) / attack_s))
               * np.exp(-np.maximum(TIME - end, 0) / release_s) for start, end, db in rows)


def scene(knock_send_db=-8, housing_send_db=-8, motor_send_db=-17):
    """The chopper stands straight ahead; reflections and a slight tilt set left and right apart."""
    # echoes of the knocks come back duller: (frequency [Hz], gain [dB])
    wall_loss = [(1000, 2), (4000, -3.5), (10000, -7)]
    # stereo width: (frequency [Hz], side minus mid [dB])
    width = [(30, -16), (80, -26), (170, -36), (350, -36), (700, -16), (1400, -28), (3000, -27),
             (6000, -19), (10000, -17), (12000, -42)]
    # stereo balance: (frequency [Hz], left minus right [dB])
    lean = [(30, -4), (80, -6), (170, -1.5), (350, -0.5), (650, 1.8), (1300, 0.8), (2800, 0.25),
            (16000, 0.1)]
    plastic = knocks()
    thumps, jolts = knock_pulses()
    handling = plastic + lid_twist() + hands(thumps, jolts) + board(thumps)
    unit, machine = housing(), motor()
    dulled = colour(plastic, lambda hz: at_hz(wall_loss, hz))
    room = kitchen(amp(knock_send_db) * dulled + amp(housing_send_db) * unit + amp(motor_send_db) * machine)
    mid = handling + wall_ring(handling) + unit + machine + room + room_tone()
    side = colour(kitchen(mid), lambda hz: at_hz(width, hz))
    return np.array([colour(mid + sign * side, lambda hz: sign * at_hz(lean, hz) / 2) for sign in (1, -1)])


def record(dry, ceiling_db=-10, release_db_per_s=2000, cutoff_hz=16300):
    """A fast limiter holds the peaks down; a steep low-pass cuts the top."""
    over_db = np.maximum(20 * np.log10(np.abs(dry).max(axis=0) + 1e-9) - ceiling_db, 0)
    held_db = np.maximum.accumulate(over_db + release_db_per_s * TIME) - release_db_per_s * TIME
    gain_db = uniform_filter1d(minimum_filter1d(-held_db, size=17), size=17)
    lowpass = signal.ellip(10, .2, 70, cutoff_hz, fs=SR, output="sos")
    return signal.sosfilt(lowpass, dry * amp(gain_db))


dry = scene()
out = record(dry)
store_wav(out)
```